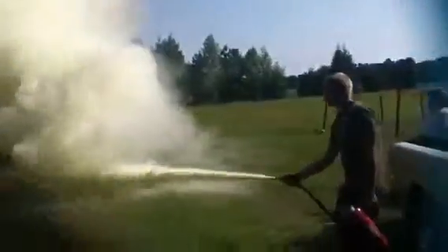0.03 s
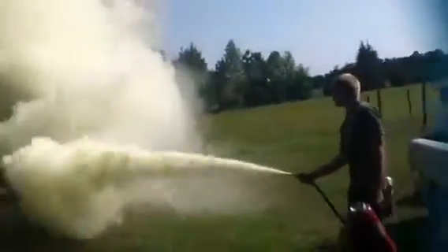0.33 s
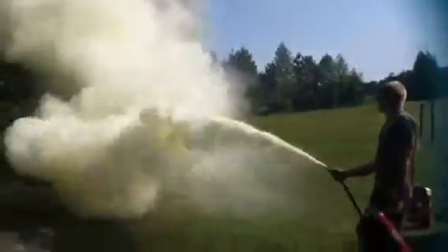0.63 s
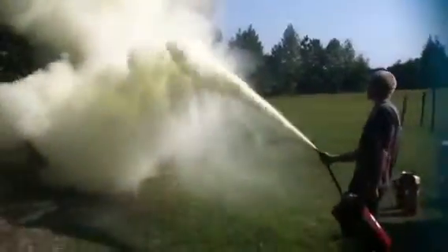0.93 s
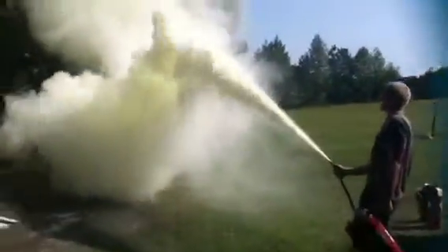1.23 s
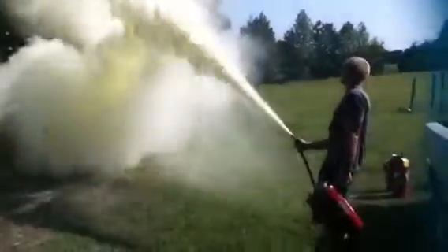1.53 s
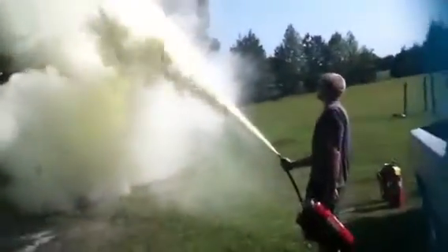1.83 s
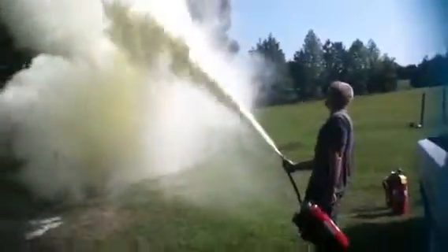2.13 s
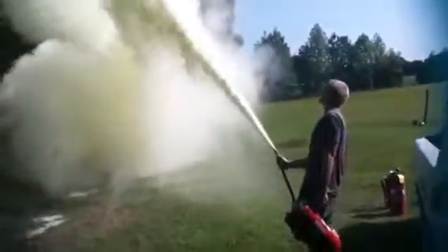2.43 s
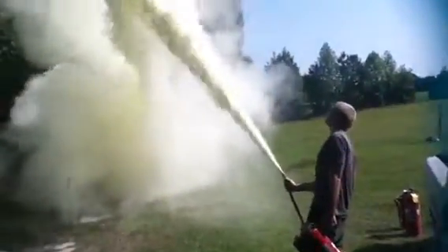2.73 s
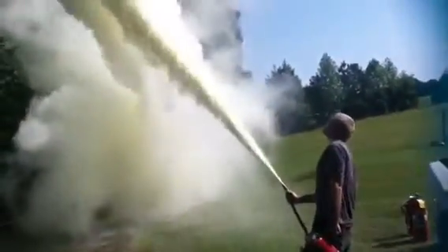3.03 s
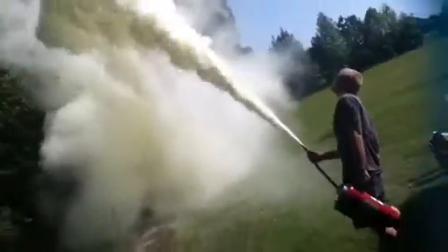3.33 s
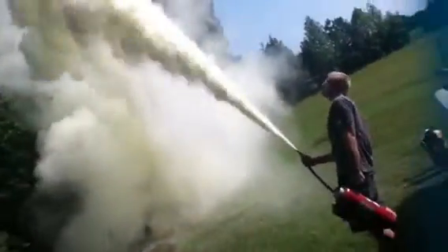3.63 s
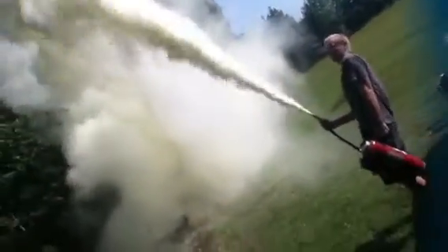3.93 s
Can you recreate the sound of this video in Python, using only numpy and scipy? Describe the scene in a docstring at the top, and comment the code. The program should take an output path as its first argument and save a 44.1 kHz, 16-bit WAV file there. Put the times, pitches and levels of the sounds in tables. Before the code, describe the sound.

A fire extinguisher sprays powder with a continuous rushing hiss and a slow, hollow swish.

```python
"""A dry-powder fire extinguisher sprays without a break in an open field, a few metres away.
From the start its churning jet hisses, gritty with powder. In the first half second a little wind
bumps the microphone, and the jet rumbles as it sweeps over the ground. Then the hose is raised: the
rumble fades and the hiss dulls. To the end, echoes from the ground and two nearby surfaces slide as
nozzle and microphone move, and mix with the hiss into a slow, hollow swish (phasing)."""
import sys
import numpy as np
from scipy import signal
from scipy.fft import rfft, irfft
from scipy.io import wavfile
from scipy.ndimage import map_coordinates

SR = 44100
rng = np.random.default_rng(int(sys.argv[2]) if len(sys.argv) > 2 else 0)


def wrap_up_sound(samples):
    """Save the sound to the file named by the first command line argument, as 16-bit audio."""
    columns = np.atleast_2d(samples).T
    # keep every value between -1 and 1, then stretch to whole-number steps
    tamed = np.clip(columns, -1, 1)
    steps = np.round(tamed * 32767).astype(np.int16)
    wavfile.write(sys.argv[1], SR, steps)


N = 176400

# how the strength of the jet rises and falls: t/s, level/dB
JET_STRENGTH = [(0, -16.5), (.11, -16.5), (.3, -15), (.48, -14), (.54, -17), (.72, -16), (.78, -18.5),
                (1.05, -18.5), (1.35, -19), (1.53, -18), (1.9, -20), (2.25, -19.5), (2.6, -19),
                (3.06, -20.5), (3.44, -18), (3.7, -19), (4, -20)]
# the jet's tone, or how strong its frequencies are next to each other: f/Hz, level/dB
JET_TONE = [(25, -46), (60, -32), (130, -24.5), (250, -20), (390, -20.5), (490, -21), (600, -10),
            (740, -8.5), (950, -9.5), (1100, -3), (1250, -7), (1500, -6), (2000, -3.5), (2450, -2.5),
            (2700, -1), (3200, -1.5), (3900, -3.5), (4550, -5), (5000, -4.7), (5600, -4.5), (6900, -10),
            (7600, -17), (8400, -21), (13200, -22), (14500, -30.5), (15500, -37)]
# boost or cut of the hiss's treble and of its low roar: t/s, level/dB
TREBLE_BOOST = [(0, 1.5), (.35, -3), (.55, 1.5), (.75, 2), (1.05, 1), (1.4, 0.2), (1.75, 1.5), (2.2, .5),
                (2.7, 0), (3.1, -0.5), (3.45, -1), (4, -2.5)]
ROAR_BOOST = [(0, -1.5), (.45, -3), (.75, -0.5), (1.1, 0), (1.5, -0.5), (2, 2.5), (2.5, 2), (3.1, 3.5),
              (3.45, 2), (4, 1.5)]
# a bright peak in the hiss that falls as the jet swings up: t/s, f/Hz, height/dB, width/octaves
BRIGHT_PEAK = [(0, 4200, 1.5, 0.37), (.3, 4300, 3.5, 0.21), (.55, 4760, 1.5, 0.22), (.66, 3480, 3, .14),
               (.78, 3350, 5.5, 0.06), (.92, 3500, 4.5, .06), (1.08, 2830, 4, 0.057),
               (1.6, 2900, 1.5, 0.13), (2.15, 2350, 0, 0.44), (2.7, 2700, 2.5, 0.071),
               (3.4, 2780, 1.5, 0.21), (4, 2150, 2.5, .3)]
# a hollow, low peak that swells and fades: t/s, f/Hz, height/dB, width/octaves
HOLLOW_PEAK = [(0, 800, -1, 0.11), (.25, 765, 5.5, .13), (.6, 910, 0.5, 0.11), (.9, 794, -1.5, .13),
               (1.2, 790, 4.5, 0.11), (1.7, 840, 2, .15), (2.4, 846, 0, 0.14), (4, 760, 0.5, 0.13)]

# how late the echoes from the ground, a side surface and the closest surface arrive: t/s, delay/ms
GROUND_DELAY = [(0, 2.19), (.28, 2.387), (.5, 2.356), (.95, 2.422), (1.38, 2.408), (1.75, 2.487),
                (2.3, 2.501), (2.7, 2.635), (3.12, 2.688), (3.42, 2.787), (4, 2.797)]
SIDE_DELAY = [(0, 2.773), (.24, 2.755), (.5, 2.4), (.92, 1.99), (1.23, 1.682), (1.6, 1.333), (1.9, 1.11),
              (2.2, .965), (2.75, .833), (3.3, .782), (4, .715)]
CLOSE_DELAY = [(0, .8), (.25, .781), (.5, .8), (.75, .638), (1, .509), (1.25, .408), (1.5, .366),
               (2.25, .343), (2.6, .375), (3.25, .389), (3.5, .441), (4, .54)]
# how much each surface sends back, before the boosts below: f/Hz, level/dB
GROUND_TONE = [(500, -10), (1200, -8), (2200, -8), (4000, -9.5), (10000, -16)]
SIDE_TONE = [(500, -13.5), (2000, -12.5), (4000, -12), (10000, -9)]
CLOSE_TONE = [(500, -17.5), (4000, -11.5), (10000, -14.5)]
# boost or cut of the ground echo, strongest while the jet is aimed low: t/s, level/dB
GROUND_BOOST = [(0, 1.5), (.8, 1.5), (1.5, 0.5), (2.5, -3), (4, 0.5)]
# boost or cut of the other two echoes as nozzle and microphone move: t/s, level/dB
SIDE_BOOST = [(0, 2), (.6, -1.5), (1.2, -1), (2, 1), (3.2, -2.5), (4, -5)]
CLOSE_BOOST = [(0, -17), (.3, -5), (1.2, -1.5), (2, -11), (2.6, -2.5), (3.2, -0.5), (4, 3.5)]

# puffs of wind on the microphone: t/s, length/s, level/dB
WIND_BUMPS = [(0.036, .05, -45), (.16, .04, -43), (0.23, .05, -46), (0.337, 0.033, -49), (2.29, .06, -56)]
# the jet's rumble as it sweeps over the ground: t/s, level/dB
RUMBLE_LEVEL = [(0, -56), (.5, -48.5), (.7, -54), (.95, -57.5), (4, -78)]

TIME = np.arange(N) / SR


def jet():
    """Rushing gas makes a hiss, and clumps of powder leaving the nozzle add tiny clicks."""
    clumps_per_s, spread_db, clump_db, jet_db = 2000, 2.5, -14, -1.1
    gas = rng.standard_normal(N)
    sizes = amp(spread_db * np.minimum(rng.exponential(1, N), 5))
    signs = rng.choice([-1, 1], N)
    clumps = sizes * signs * (rng.random(N) < clumps_per_s / SR)
    hiss = unit(colour(gas + amp(clump_db) * unit(clumps), JET_TONE))
    # cut the hiss into short slices, so that its tone can change from moment to moment
    slicing = dict(fs=SR, nperseg=512, noverlap=384)
    hz, t, slices = signal.stft(hiss, **slicing)
    slices = slices * amp(aim_tone(hz, t) + turbulence(hz, t))
    hiss = signal.istft(slices, **slicing)[1][:N]
    return hiss * amp(jet_db + curve(JET_STRENGTH))


def turbulence(hz, t):
    """Churning gas flickers in patches of frequency and sputters as a whole; gives dB."""
    patch_db, patch_s, patch_hz = 1.05, 0.037, 397
    sputter_db, sputter_s = 0.31, 0.0081
    patches = blur(rng.standard_normal((len(hz), len(t))), patch_hz / hz[1], axis=0)
    patches = blur(patches, patch_s / t[1], axis=1)
    sputter = blur(rng.standard_normal((1, len(t))), sputter_s / t[1], axis=1)
    return patch_db * unit(patches) + sputter_db * unit(sputter)


def aim_tone(hz, t):
    """Aiming the jet changes its treble, its low roar and two peaks; gives dB."""
    treble_edge_hz, roar_edge_hz = (3500, 4200), (1250, 2200)
    treble = np.outer(np.interp(hz, treble_edge_hz, [0, 1]), curve(TREBLE_BOOST, t))
    roar = np.outer(np.interp(hz, roar_edge_hz, [1, 0]), curve(ROAR_BOOST, t))
    return treble + roar + peak(BRIGHT_PEAK, hz, t) + peak(HOLLOW_PEAK, hz, t)


def peak(table, hz, t):
    """A bell-shaped hump in the tone whose centre, height and width move; gives dB."""
    when, *columns = np.transpose(table)
    centre, height, width = (np.interp(t, when, column) for column in columns)
    octaves_away = np.log2((hz[:, None] + 1) / centre)
    return height * np.exp(-(octaves_away / width) ** 2 / 2)


def echo(sound, delay_ms, tone, boost):
    """A surface sends back a weaker, later copy; the delay slides as the path changes length."""
    earlier_samples = (TIME - curve(delay_ms) / 1000) * SR
    delayed = map_coordinates(colour(sound, tone), [earlier_samples], order=3, mode="mirror")
    return amp(curve(boost)) * delayed


def wind():
    """Puffs of air push on the microphone and make short, deep bumps."""
    push = sum(amp(db) * np.exp(-(2 * (TIME - when) / length) ** 2) for when, length, db in WIND_BUMPS)
    return push * band_noise(edges_hz=(25, 95))


def rumble():
    """The jet rumbles softly while it is aimed along the ground."""
    return amp(curve(RUMBLE_LEVEL)) * band_noise(edges_hz=(95, 190))


def amp(db):
    """Turns decibels into a number to multiply by."""
    return 10 ** (np.asarray(db) / 20)


def unit(x):
    """Scales a signal to an average strength (rms) of one."""
    return x / np.sqrt(np.mean(x ** 2) + 1e-20)


def curve(points, t=TIME):
    """Joins a table's points over time with straight lines."""
    return np.interp(t, *np.transpose(points))


def colour(x, tone):
    """Turns each frequency up or down by a table of f/Hz, level/dB."""
    table_hz, table_db = np.transpose(tone)
    hz = np.fft.rfftfreq(N, 1 / SR)
    db = np.interp(np.log(hz + 1), np.log(table_hz + 1), table_db)
    return irfft(rfft(x) * amp(db), N)


def band_noise(edges_hz):
    """Noise of strength one between two frequencies."""
    band = signal.butter(2, edges_hz, "band", fs=SR, output="sos")
    return unit(signal.sosfilt(band, rng.standard_normal(2 * N))[N:])


def blur(x, width, axis):
    """Smooths a grid along one axis, over about `width` steps."""
    f = np.fft.fftfreq(x.shape[axis])
    bell = np.expand_dims(np.exp(-(np.pi * f * width) ** 2 / 2), 1 - axis)
    return np.fft.ifft(np.fft.fft(x, axis=axis) * bell, axis=axis).real


def scene():
    """The jet, its three echoes, the wind and the rumble, the same in both channels."""
    direct = jet()
    ground = echo(direct, GROUND_DELAY, GROUND_TONE, GROUND_BOOST)
    side = echo(direct, SIDE_DELAY, SIDE_TONE, SIDE_BOOST)
    close = echo(direct, CLOSE_DELAY, CLOSE_TONE, CLOSE_BOOST)
    mono = direct + ground + side + close + wind() + rumble()
    return np.array([mono, mono])


def record(dry):
    """Cuts away the very highest treble."""
    cut_hz = 15650
    low_pass = signal.firwin(511, cut_hz, window=("kaiser", 9), fs=SR)
    return signal.oaconvolve(dry, low_pass[None], "same", axes=1)


dry = scene()
out = record(dry)
wrap_up_sound(out)
```